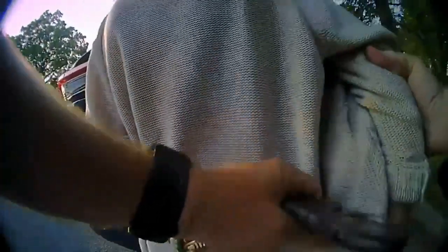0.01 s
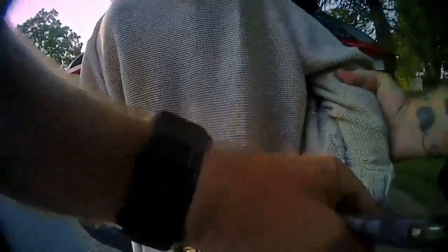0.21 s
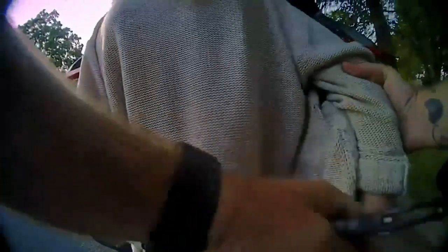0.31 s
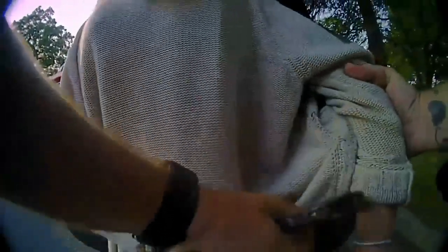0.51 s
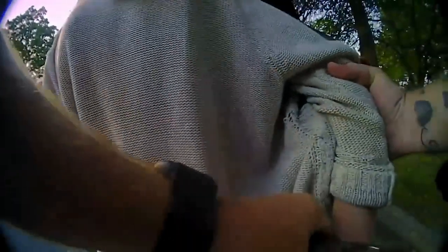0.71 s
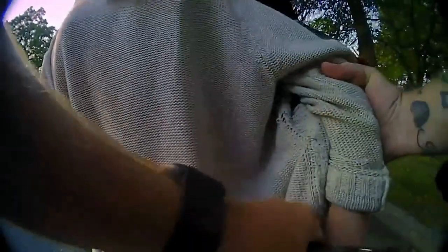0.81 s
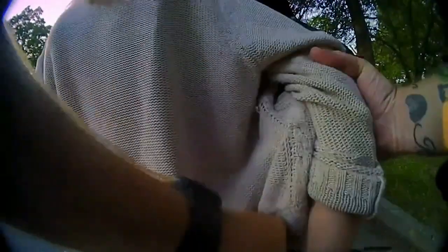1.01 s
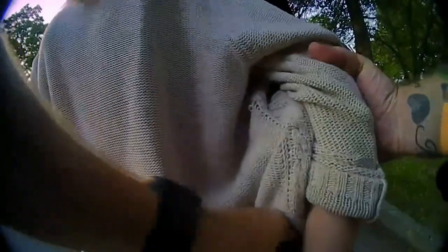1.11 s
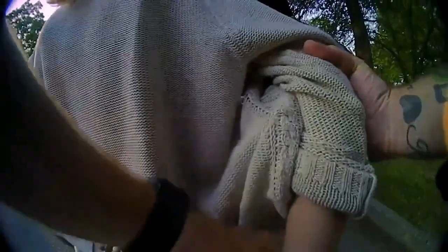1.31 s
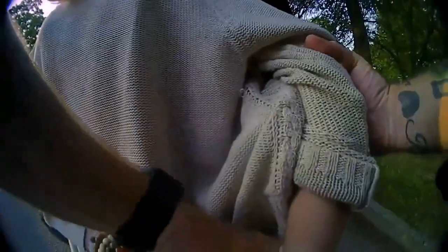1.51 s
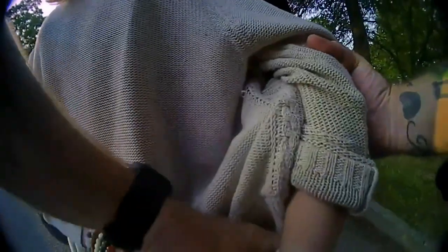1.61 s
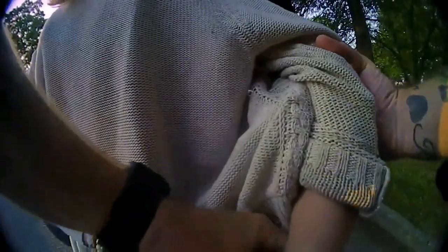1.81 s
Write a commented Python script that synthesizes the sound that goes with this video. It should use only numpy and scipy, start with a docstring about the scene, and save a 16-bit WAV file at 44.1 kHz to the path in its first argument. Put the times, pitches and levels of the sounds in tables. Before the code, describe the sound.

Steel handcuffs ratchet shut in a fast burst of sharp clicks, with faint sleeve rustle outdoors

```python
"""Handcuffs ratcheting shut

Steel handcuffs close on a wrist outdoors, built from decaying steel modes and filtered noise bursts.
The pawl races over the ratchet teeth and slows to single clicks; then links jingle and a last clack lands.
A sleeve rustles as shaped noise with tiny fibre catches, over dull handling, far noise and shrill bands.
A gain control ducks the mix at loud clicks and lets the background swell back over a steady rumble."""
import sys
import numpy as np
from scipy import signal
from scipy.fft import rfft, irfft
from scipy.io import wavfile
from scipy.ndimage import uniform_filter1d, minimum_filter1d

SR = 44100
rng = np.random.default_rng(int(sys.argv[2]) if len(sys.argv) > 2 else 0)


def wrap_up_sound(samples):
    """Save the sound to the file named by the first command line argument, as 16-bit audio."""
    columns = np.atleast_2d(samples).T
    # keep every value between -1 and 1, then stretch to whole-number steps
    tamed = np.clip(columns, -1, 1)
    steps = np.round(tamed * 32767).astype(np.int16)
    wavfile.write(sys.argv[1], SR, steps)


N = 81585  # length in samples

# The pawl drops over the teeth. Each row: start in seconds, level in dB, pitch ratio of the body modes,
# rebound delay in ms, low knock trim in dB, brightness in dB, high ping trim in dB, low edge in Hz.
CLICKS = [(0.235, 2.5, 0.9, 1.4, 5, 4, 0.5, 89), (0.2467, 0.5, 0.94, .8, -5, -5.5, -10, 890),
          (0.2613, -4, 0.95, 1.12, -6.5, 2.5, -0.5, 1150), (0.2724, -0.5, 1.0, 1.0, 2, 4, 4, 1120),
          (0.2835, -3, 0.93, 1.2, 1.5, 6.5, 2, 1150), (0.2922, -3, 0.99, .8, -1.5, 10, 1, 1150),
          (0.3013, -5.5, 1.0, 2.7, 6, 3.5, 3, 1157), (.3113, -5, 0.95, 1.6, 1, 8, 0, 1150),
          (0.3187, -5, 1, 1.5, 0, 6.5, 4.5, 1144), (0.3268, -4, 0.97, 1.2, -8, 7, 1, 1150),
          (0.3346, -4, 0.88, 1.0, -8, 5.5, 8.5, 1140), (.3450, -5.5, 0.95, 1.0, 2.5, 13, 0.5, 1158),
          (.3613, -4, .95, 1.2, -0.5, 0, 12.5, 817), (0.3706, -4.5, .94, .8, -2.5, 9, 4.5, 800),
          (0.3909, 0, .93, 2.6, 2, 3.5, 11.5, 594), (.4144, -4, 0.91, 1.6, -7, 6, 3.5, 600),
          (0.4381, -5.5, .95, 0.717, -5, 3.5, 3, 1290), (0.4895, 2, .99, 1.4, -11.5, 1, -1, 1090),
          (0.6147, -8, 0.97, 1.2, -17, 0.5, -38, 498), (0.784, -24, 0.92, .6, 5, -3, -24, 1400),
          (1.5569, -2.5, 0.918, .66, 9.5, -18, 6, 150)]
# Light touches of the links and the bow. Each row: start in seconds, level in dB, low knock trim in dB,
# brightness in dB.
TOUCHES = [(0.0747, -37, -16, 12), (0.0784, -47, -4, -1), (0.187, -47, 14.5, -19), (0.2337, -13, 8, -12),
           (.855, -49, -2.5, 1), (.990, -54, -11, 16), (1.0217, -43.5, 9, 13.5), (1.04, -40, 11, -7),
           (1.056, -33.5, 0, 3), (1.0613, -41.5, -6, 13), (1.064, -43.5, -1, -2), (1.070, -38, 0, 9),
           (1.0735, -46, 4, 19), (1.078, -52, 8, 13), (1.085, -47, 0, -2), (1.1026, -45, 2, 15),
           (1.1462, -44.5, 0, 2), (1.1481, -44, 4.5, 8), (1.166, -34.5, -11, -17), (1.167, -34, -5, -17),
           (1.1911, -42, 5, 8), (1.2578, -48, 9, 8), (1.550, -43.5, 19, -4), (1.5556, -9.5, 11, -25),
           (1.788, -45.5, 20, -20.5), (1.826, -44, 6, -13)]
# Ringing modes of the cuff: its body, its edges and its highest pings. Each row: frequency in Hz
# (at pitch ratio 1 for the body), relative level in dB, t60 in seconds before the grip chokes it.
BODY_MODES = [(3543, -8.5, 0.0059), (4203, -7, 0.0084), (4642, 0, 0.005), (5033, 0, 0.012),
              (5530, -7.5, 0.0067), (6354, -9.5, 0.0079)]
EDGE_MODES = [(7540, -15, 0.0046), (9520, -15.5, 0.0036), (12740, -25, 0.0046), (14100, -15, .005),
              (14950, -18, 0.006)]
PING_MODES = [(11320, -15, .008), (12170, -11.5, 0.0043)]
# Steel sliding on steel. Each row: time in seconds, level in dB.
SLIDE = [(1.0, -76.5), (1.035, -50), (1.06, -39), (1.1, -43.5), (1.13, -52.5), (1.17, -50), (1.22, -51.5),
         (1.55, -75)]
# How hard the sleeve rubs. Each row: time in seconds, level in dB before the waver.
RUB = [(0, -51), (.2, -54.5), (.3, -64), (.7, -51.5), (.86, -52), (1.0, -53), (1.1, -50), (1.3, -48),
       (1.5, -46.5), (1.6, -51), (1.85, -47)]
# Colour of the rubbing knit. Each row: frequency in Hz, relative density in dB per Hz.
CLOTH = [(35, -37.5), (60, -2.5), (96, -13), (176, 0), (346, -1.5), (480, -2), (1740, -14.5), (2840, -15),
         (3760, -41.5), (4640, -16), (10000, -30), (14600, -32), (16000, -43)]
# Colour of the fibre catches. Each row: frequency in Hz, relative gain in dB.
FIBRE_COLOUR = [(200, 0.5), (1200, 6), (2500, -10), (4800, -2.5), (7500, -13.5), (15000, -15.5)]
# The arm shifts against the microphone's housing. Each row: time in seconds, level in dB.
SHIFT = [(0, -49), (.1, -50.5), (.2, -50.5), (.45, -61), (.7, -57.5), (.86, -44.5), (1.0, -51.5),
         (1.3, -65), (1.55, -47), (1.7, -44.5), (1.85, -43.5)]
# Colour of the outdoor background. Each row: frequency in Hz, relative density in dB per Hz.
AIR = [(15, -35), (25, -7), (236, 4), (344, -17.5), (427, -1), (734, -11), (1260, -10), (1650, -38),
       (2910, -20), (3160, -10.5), (3430, -25.5), (3720, -21.5), (4870, -16.5), (6050, -44), (16000, -22)]
# Faint far-off shrill bands. Each row: centre in Hz, width of each of two resonances in Hz,
# level in dB before the swell.
SHRILL = [(2780, 310, -63), (3405, 120, -60), (4470, 1600, -58.5)]
# Swell of all the shrill bands together. Each row: time in seconds, added level in dB.
SHRILL_SWELL = [(0, 7), (.2, -6), (.55, -11.5), (.7, -15), (.78, 9), (.93, 1.5), (1.05, -2.5), (1.5, -4),
                (1.62, 7.5), (1.75, -4), (1.85, -3)]

REBOUND_DB, STRIKE_SPREAD_DB = -3.5, 1.5
GRIP_S = 0.0028  # the fingers choke the ring by a factor e within this time
CRACK_DB, CRACK_T60_S = -7.5, 0.0042
KNOCK_DB, KNOCK_T60_S, KNOCK_BAND_HZ = -10.98, .009, (1460, 3030)  # level before each row's trim
THUD_DB, THUD_HZ = -12, 421  # level before half the knock trim
HISS_BED_S, HISS_BED_DB = (.25, .358), -20  # start and end, during the fast run
SNAG_S, SNAGS_PER_S, SNAG_DB = (1.17, 1.4), 59, -55.5  # while the bow is pressed home
FIBRES_PER_S, FIBRE_DB, FIBRE_SPREAD_DB = 400, -15.5, 5.5  # level relative to the rush
RUB_WAVER_DB, RUB_WAVER_HZ = 1.5, 25.33
SHIFT_HZ, SHIFT_WIDTH_HZ, SHIFT_SUB_DB = 208.6, 110, -4
CHEST_ECHO_S, CHEST_ECHO_DB = .0031, -14.5
SCATTER_DB, SCATTER_T60_S = -23, 0.033
YARD_DB, YARD_T60_S = -40, .3
AIR_DB = -49.5
CEILING_DB, RELEASE_DB_PER_S, START_DUCK_DB = -17, 39.5, 15
RUMBLE_DB, RUMBLE_HZ = -62.5, 54.3
CUTOFF_HZ = 16100


def from_db(db):
    """Decibels to gain."""
    return 10 ** (np.asarray(db) / 20)


def rms_one(x):
    """Scale to unit power."""
    return x / np.sqrt(np.mean(x ** 2) + 1e-20)


def in_time(rows):
    """Read a breakpoint curve at every sample."""
    return np.interp(np.arange(N) / SR, *np.transpose(rows))


def filtered(x, hz, kind, order=2):
    """Butterworth filter."""
    return signal.sosfilt(signal.butter(order, hz, kind, fs=SR, output="sos"), x)


def coloured(x, spectrum):
    """Shape a noise or grain stream with a spectrum; unit power."""
    hz, db = np.transpose(spectrum)
    bins = np.maximum(np.fft.rfftfreq(N, 1 / SR), 1)
    gain = from_db(np.interp(np.log(bins), np.log(hz), db))
    return rms_one(irfft(rfft(x) * gain, N))


def resonance(x, hz, width_hz):
    """Two-pole band-pass."""
    r = np.exp(-np.pi * width_hz / SR)
    zeros = np.array([1, 0, -1]) * (1 - r * r) / 2
    poles = [1, -2 * r * np.cos(2 * np.pi * hz / SR), r * r]
    return signal.lfilter(zeros, poles, x)


def dying(t, t60):
    """Exponential decay that starts at t = 0."""
    return (t >= 0) * np.exp(-np.log(1000) * np.abs(t) / t60)


def add(out, s, sound):
    """Mix a short sound in at time s."""
    start = int(s * SR)
    out[start:start + len(sound)] += sound[:N - start]


def grains(per_s, spread_db):
    """Random tiny impacts of uneven size and either polarity."""
    sizes = from_db(spread_db * np.minimum(rng.exponential(1, N), 4))
    hits = rng.random(N) < per_s / SR
    return hits * sizes * rng.choice([-1, 1], N)


def ring(t, modes, pitch=1):
    """Struck modes decay as sines, each with a slightly different strength on every blow."""
    out = 0
    for k, (hz, db, t60) in enumerate(modes):
        strength = from_db(db + STRIKE_SPREAD_DB * rng.standard_normal())
        polarity = (-1) ** k
        out = out + polarity * strength * np.sin(2 * np.pi * hz * pitch * t) * dying(t, t60)
    return out


def strike(pitch, rebound_ms, knock_db, bright_db, ping_db, edge_hz):
    """Steel hits steel and rebounds once: modes, crack, knock and thud; energy of 10 ms at unit power."""
    t = np.arange(SR // 25) / SR
    out = 0
    for age, gain in ((t, 1), (t - rebound_ms / 1000, from_db(REBOUND_DB))):
        crack_burst = rng.standard_normal(len(t)) * dying(age, CRACK_T60_S)
        crack = from_db(CRACK_DB) * filtered(crack_burst, 2400, "high")
        knock_burst = rng.standard_normal(len(t)) * dying(age, KNOCK_T60_S)
        knock = from_db(KNOCK_DB + knock_db) * filtered(knock_burst, KNOCK_BAND_HZ, "band", order=3)
        thud_burst = rng.standard_normal(len(t)) * dying(age, KNOCK_T60_S)
        thud = from_db(THUD_DB + knock_db / 2) * filtered(thud_burst, THUD_HZ, "low")
        pings = from_db(ping_db) * ring(age, PING_MODES)
        treble = from_db(bright_db) * (ring(age, EDGE_MODES) + pings)
        blow = ring(age, BODY_MODES, pitch) + treble + crack + knock + thud
        out = out + gain * blow * np.exp(-(age / GRIP_S) ** 2)
    out = filtered(out, edge_hz, "high", order=4)
    return out / np.sqrt(np.sum(out ** 2) / (SR / 100))


def ratchet():
    """The pawl snaps into tooth after tooth, over a steady bed of bright grainy hiss during the fast run."""
    t = np.arange(N) / SR
    hiss_bed = rms_one(filtered(grains(per_s=2900, spread_db=2.5), 4000, "high"))
    out = from_db(HISS_BED_DB) * hiss_bed * (t > HISS_BED_S[0]) * (t < HISS_BED_S[1])
    for s, db, *colour in CLICKS:
        add(out, s, from_db(db) * strike(*colour))
    return out


def links():
    """Loose parts touch as faint strikes and slide over each other as dense streams of tiny slips."""
    out = np.zeros(N)
    for s, db, knock_db, bright_db in TOUCHES:
        pitch = 1.007 * rng.uniform(1.0, 1.03)
        rebound_ms = rng.uniform(0.37, 1.4)
        touch = strike(pitch, rebound_ms, knock_db, bright_db, ping_db=-13, edge_hz=290)
        add(out, s, from_db(db) * touch)
    slips = grains(per_s=2200, spread_db=2.5)
    steel_band = rms_one(resonance(slips, hz=5060, width_hz=900))
    hiss = rms_one(filtered(slips, 5000, "high"))
    return out + from_db(in_time(SLIDE)) * (steel_band + from_db(-3.5) * hiss)


def snags():
    """Threads catch on the steel and let go with tiny ticks, one strike repeated at random."""
    t = np.arange(N) / SR
    tick = strike(pitch=0.96, rebound_ms=0.924, knock_db=6, bright_db=5, ping_db=-13, edge_hz=670)
    ticks = signal.fftconvolve(grains(SNAGS_PER_S, spread_db=2.5), tick)[:N]
    return from_db(SNAG_DB) * rms_one(ticks) * (t > SNAG_S[0]) * (t < SNAG_S[1])


def sleeve():
    """Knit fabric rubs unevenly: a soft rush with tiny catches of its fibres."""
    rush = coloured(rng.standard_normal(N), CLOTH)
    catches = coloured(grains(FIBRES_PER_S, FIBRE_SPREAD_DB), FIBRE_COLOUR)
    waver = rms_one(filtered(rng.standard_normal(N), RUB_WAVER_HZ, "low"))
    pressure = from_db(in_time(RUB) + RUB_WAVER_DB * waver)
    return pressure * (rush + from_db(FIBRE_DB) * catches)


def handling():
    """Dull rubbing carried through the clothes into the microphone: a low resonance and a sub band."""
    body = rms_one(resonance(rng.standard_normal(N), SHIFT_HZ, SHIFT_WIDTH_HZ))
    body = filtered(body, 2 * SHIFT_HZ, "low")
    sub = rms_one(filtered(rng.standard_normal(N), [25, 65], "band"))
    return from_db(in_time(SHIFT)) * (body + from_db(SHIFT_SUB_DB) * sub)


def surroundings(x):
    """An echo off the chest, scatter from the arms and a faint outdoor tail."""
    t = np.arange(SR // 2) / SR
    response = np.zeros(len(t))
    for db, t60 in ((SCATTER_DB, SCATTER_T60_S), (YARD_DB, YARD_T60_S)):
        tail = rng.standard_normal(len(t)) * dying(t - CHEST_ECHO_S, t60)
        response += from_db(db) * tail / np.sqrt(np.sum(tail ** 2))
    response[int(CHEST_ECHO_S * SR)] += from_db(CHEST_ECHO_DB)
    return x + signal.fftconvolve(x, response)[:N]


def outdoors():
    """Steady far noise with faint shrill bands of resonated noise that swell and fade."""
    shrill = np.zeros(N)
    for hz, width_hz, db in SHRILL:
        band = resonance(rng.standard_normal(N), hz, width_hz)
        band = resonance(band, hz, width_hz)  # a second pass steepens the skirts
        shrill += from_db(db) * rms_one(band)
    air = from_db(AIR_DB) * coloured(rng.standard_normal(N), AIR)
    return air + from_db(in_time(SHRILL_SWELL)) * shrill


def scene():
    """Cuffs in their surroundings, then sleeve, handling and the open air."""
    steel = surroundings(ratchet() + links() + snags())
    return (steel + sleeve() + handling() + outdoors())[None]


def gain_control(x):
    """Turn down just ahead of any short-term level over the ceiling, then recover at a steady rate."""
    power = uniform_filter1d(x ** 2, size=176)  # 4 ms average
    level_db = 10 * np.log10(np.maximum(power, 1e-12))
    over_db = np.maximum(level_db - CEILING_DB, 0)
    over_db[0] = START_DUCK_DB  # the sound opens already turned down
    recovery_db = RELEASE_DB_PER_S * np.arange(N) / SR
    gain_db = recovery_db - np.maximum.accumulate(over_db + recovery_db)
    early_db = minimum_filter1d(gain_db, size=130)  # look ahead about 1.5 ms
    return x * from_db(uniform_filter1d(early_db, size=60))


def record(dry):
    """Gain control, a faint steady rumble and the top cut."""
    low_noise = filtered(rng.standard_normal(N), [RUMBLE_HZ / 2, RUMBLE_HZ], "band", order=1)
    out = gain_control(dry[0]) + from_db(RUMBLE_DB) * rms_one(low_noise)
    top_cut = signal.ellip(10, .3, 75, CUTOFF_HZ, fs=SR, output="sos")
    return signal.sosfilt(top_cut, out)[None]


dry = scene()
out = record(dry)
wrap_up_sound(out)
```